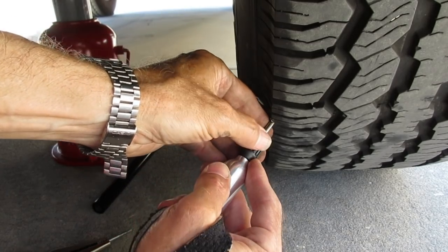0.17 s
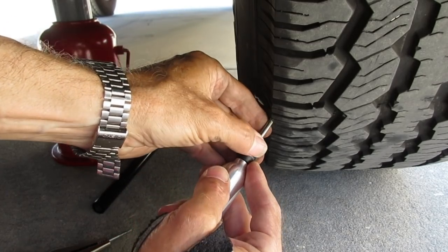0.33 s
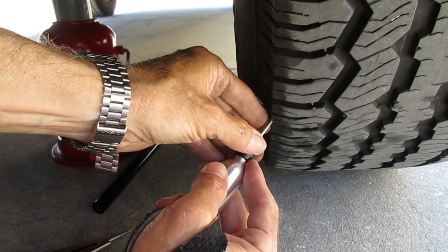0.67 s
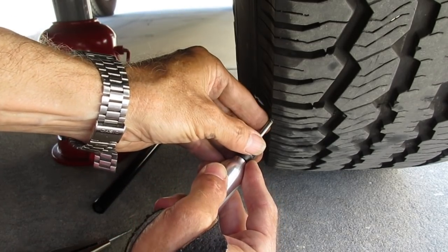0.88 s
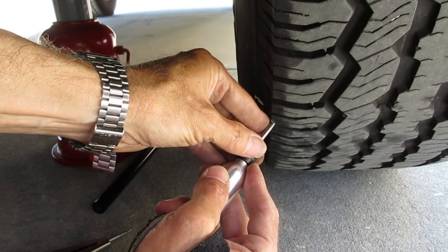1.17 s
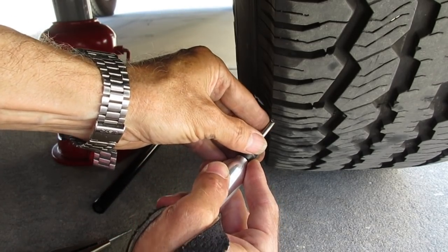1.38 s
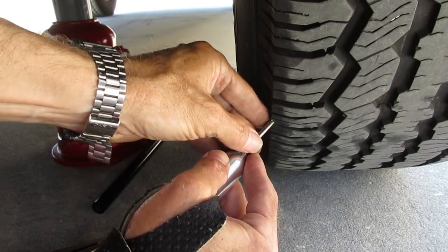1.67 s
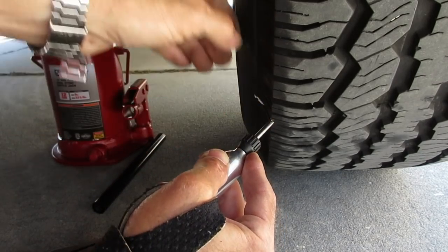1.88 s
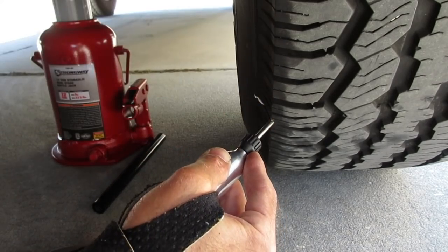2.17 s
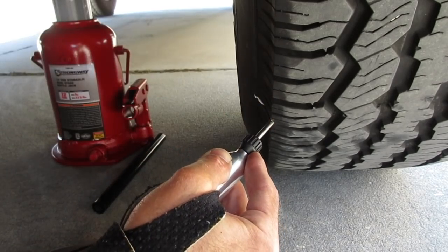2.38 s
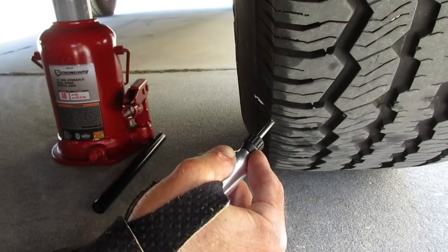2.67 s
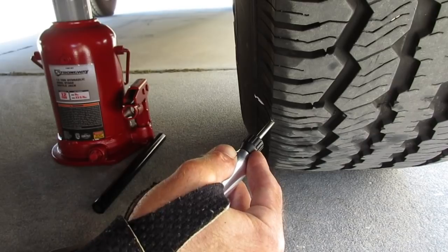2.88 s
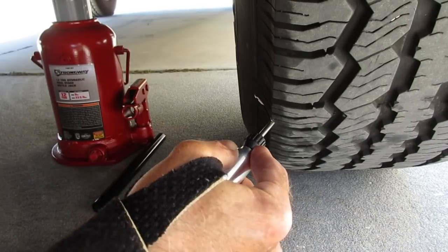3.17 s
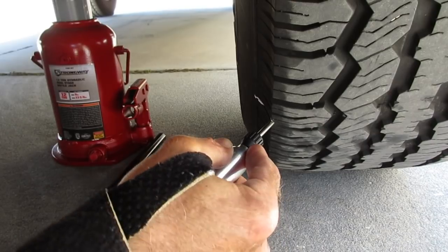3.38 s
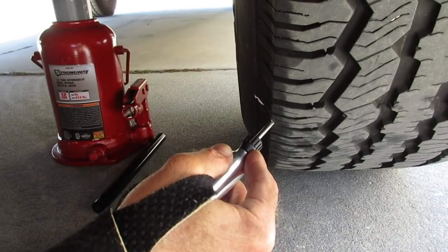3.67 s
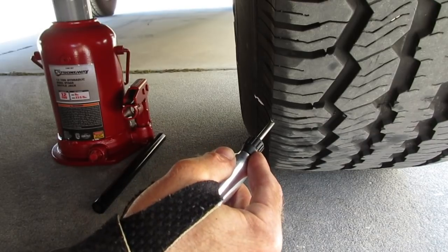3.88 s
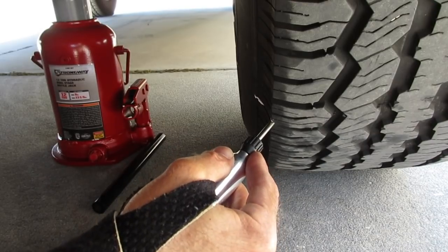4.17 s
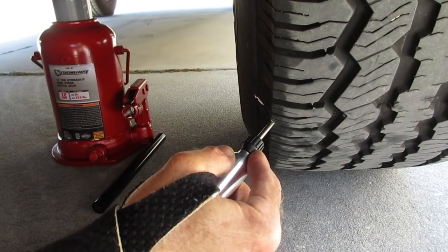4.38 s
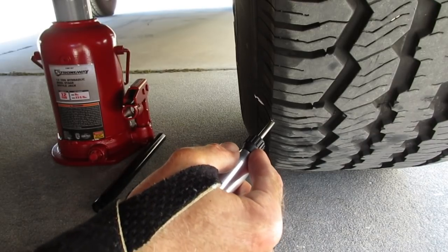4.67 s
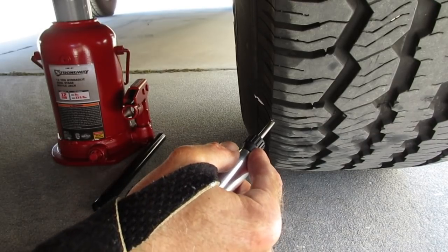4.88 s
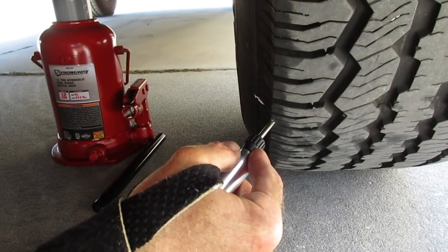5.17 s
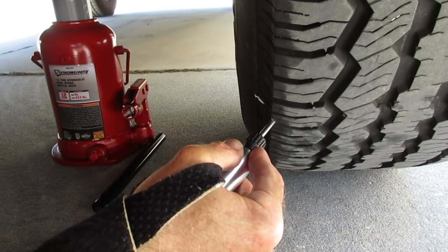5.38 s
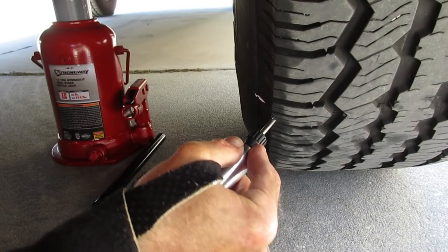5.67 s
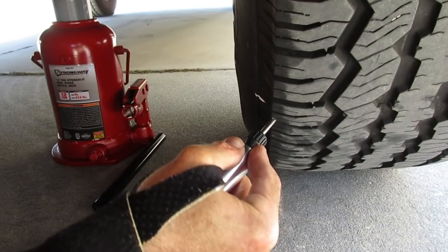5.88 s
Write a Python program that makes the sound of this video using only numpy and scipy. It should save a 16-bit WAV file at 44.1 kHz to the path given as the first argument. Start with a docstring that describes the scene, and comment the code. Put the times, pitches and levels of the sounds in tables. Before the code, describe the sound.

A loud steady tire leak hisses, flutters as a steel tool works the rubber with scrapes and low bumps, then cuts off, leaving faint scratches.

```python
"""Air hisses from a puncture in a tire: turbulent noise, shaped frame by frame in time and frequency.
Fingers shield the hole at first and the jet roars against them as filtered noise; then it blows free,
its spectrum rippled by echoes off tread and rim. A steel plug tool scrapes (slip trains through resonances),
knocks (decaying dull noise) and judders (damped cycles) in the rubber of a tire in a garage.
The hole seals, and the tool scrapes on over a quiet background of noise that swells a little."""
import sys
import numpy as np
from scipy import signal
from scipy.fft import rfft, irfft
from scipy.io import wavfile
from scipy.ndimage import uniform_filter1d

SR = 44100
rng = np.random.default_rng(int(sys.argv[2]) if len(sys.argv) > 2 else 0)


def unload_audio(sound):
    """Save the sound as a 16-bit wav file, at the path given as the first command line argument."""
    columns = np.transpose(np.atleast_2d(sound))
    # keep every value between -1 and 1, then stretch to whole-number steps
    steps = np.round(np.clip(columns, -1, 1) * 32767)
    wavfile.write(sys.argv[1], SR, steps.astype(np.int16))


N = 266319
TIME = np.arange(N) / SR  # s


def gain_of(db):
    """Decibel law: 20 dB is a factor of ten in amplitude."""
    return 10 ** (np.asarray(db) / 20)


def evened(x):
    """Normalisation by mean power: scales x to rms 1."""
    return x / np.sqrt(np.mean(x ** 2) + 1e-20)


def read(points, hz):
    """Interpolation of a spectrum along a logarithmic frequency axis."""
    f, value = np.transpose(points)
    return np.interp(np.log(hz + 1), np.log(f + 1), value)


def follow(rows, t):
    """Linear interpolation in time of each column of a curve."""
    s, *columns = np.transpose(rows)
    return [np.interp(t, s, column) for column in columns]


def step(t, at, edge):
    """Sigmoid transition: a smooth rise from 0 to 1 around a time."""
    return .5 + .5 * np.tanh((t - at) / (2 * edge))


def hump(t, middle, half):
    """Fourth-order exponential window: a flat-topped swell of height 1, down to 1/e at the half length."""
    return np.exp(-np.square((t - middle) / half) ** 2)


def coloured(x, points):
    """Linear filtering: multiplies the spectrum of x by a gain curve, then sets rms 1."""
    gain = gain_of(read(points, np.fft.rfftfreq(N, 1 / SR)))
    return evened(irfft(rfft(x) * gain, N))


def wobble(top_hz):
    """Band-limited random modulation: noise weakened below 4 Hz and above top_hz, at rms 1."""
    hz = np.fft.rfftfreq(N, 1 / SR)
    band = hz / (hz + 4) / (1 + (hz / top_hz) ** 2)
    return evened(irfft(rfft(rng.standard_normal(N)) * band, N))


def slips(per_s, spread_db):
    """Stick-slip friction as a random impulse train of uneven sizes and either sign."""
    size = gain_of(spread_db * np.minimum(rng.exponential(1, N), 3))
    sign = rng.choice([-1., 1.], N)
    happens = rng.random(N) < per_s / SR
    return evened(size * sign * happens)


def band_db(field_db, hz, band):
    """Power summation over the bins of one band, in every frame."""
    inside = (hz >= band[0]) & (hz < band[1])
    power = gain_of(field_db[:, inside]) ** 2
    return 10 * np.log10(power.sum(1))


def jet(patchy_db=0.82, flutter_db=0.24, flutter_hz=90, scatter=0.61, ripple_depth=0.97):
    """Turbulent jet noise: random phases under a spectrum set by the fingers and the shape of the gap."""
    # relative slow levels of the hiss before choking and sealing: t/s, core level/dB, body level/dB, fizz level/dB
    flow = [(0, -22, -28.5, -26.5), (.32, -16.5, -25, -23), (.7, -16.5, -30.5, -25.5),
            (1.08, -15.5, -31.5, -24), (1.2, -18.5, -33.5, -26), (1.5, -21, -30.5, -25.5),
            (1.75, -27.5, -37, -35.5), (2.12, -19.5, -34.5, -28), (2.41, -21.5, -35, -24),
            (2.52, -20, -32.5, -34), (2.85, -17.5, -34.5, -32), (3.25, -16, -33, -29),
            (3.5, -17.5, -30, -31.5), (4, -15.5, -30, -29), (4.45, -18.5, -28, -29.5),
            (4.58, -13, -31, -27.5), (4.72, -17, -34, -29), (5.32, -15.5, -33, -30)]
    # spectrum of the unobstructed jet: f/Hz, level per Hz/dB
    free = [(100, -29), (400, -39.5), (900, -27), (1600, -28.5), (2400, -23), (3100, -18), (4500, -15),
            (5700, -11), (7500, -8), (9500, -2), (10900, 0.5), (12400, -7), (13500, -12), (15000, -18.5)]
    # spectrum of the jet behind the fingers: f/Hz, level per Hz/dB
    shielded = [(100, -34), (400, -25.5), (900, -21.5), (1500, -17.5), (2400, -16), (3200, -10), (4700, -7),
                (6300, -5), (7500, -4.5), (8200, -4), (10500, 1.5), (12400, -9.5), (13400, -16),
                (15000, -19)]
    # change of colour as the rubber pinches the jet: f/Hz, level change/dB
    pinched = [(200, -19), (1400, -0.5), (2300, 2), (3050, 6), (4400, 1), (5500, 4), (6400, 0), (7500, 1.5),
               (11200, 1), (11650, 3), (12200, -6), (12500, 10), (12950, 7), (13400, 3)]
    # the tool briefly chokes the gap: middle t/s, half length t/s, loss of core level/dB
    chokes = [(1.874, 0.033, 5.5), (1.94, 0.026, 1), (2.046, .04, 6), (2.252, 0.046, 4), (2.373, 0.041, 5),
              (2.568, 0.048, 5), (2.739, 0.037, 10.5), (3.415, 0.077, 5), (4.19, .13, 2), (5.205, 0.034, 4)]
    # the pinched gap sings briefly: t/s, half length t/s, f/Hz, half width f/Hz, lift of level/dB
    spits = [(1.81, .025, 11700, 1000, 6), (1.84, .016, 8200, 1300, 11), (1.91, .012, 8200, 1300, 10),
             (2.02, .04, 13000, 800, 3), (2.44, .02, 11400, 900, 5), (2.495, .022, 8700, 1000, 9),
             (2.685, .02, 6600, 1900, 5.5)]
    body_hz, core_hz, fizz_hz = (3500, 6500), (7000, 12000), (12300, 15000)
    frame, hop = 512, 128  # samples
    t, hz = np.arange(N // hop + 5) * hop / SR, np.fft.rfftfreq(frame, 1 / SR)

    # the fingers leave at 1.87 s; the tool alone shields the hole a little
    hand_off_s, hand_move_s, tool_shield = 1.87, .1, 0.16
    shield = (1 - (1 - tool_shield) * step(t, hand_off_s, hand_move_s))[:, None]
    pinch_from_s, pinch_to_s, pinch_edge_s = 1.84, 2.54, 0.025
    pinch = (step(t, pinch_from_s, pinch_edge_s) - step(t, pinch_to_s, pinch_edge_s))[:, None]
    field = shield * read(shielded, hz) + (1 - shield) * read(free, hz) + pinch * read(pinched, hz)

    # the jet swings with pinch and tool, which shifts its ripple in frequency
    pinch_swing, swing_per_s, straight_s = 0.023, .002, 3.8
    aim = 1 - pinch_swing * pinch + swing_per_s * (t[:, None] - straight_s) * (1 - shield)
    # fingers scatter the echoes and flatten their ripple, with full effect from 6400 Hz up
    scattered = scatter * shield * np.minimum(hz / 6400, 1) ** 2
    field = field + ripple_depth * (1 - scattered) * ripple_db(hz / aim)

    # a choked gap loses its core and keeps most of its body and part of its fizz
    core, body, fizz = follow(flow, t)
    choke = sum(db * hump(t, s, half) for s, half, db in chokes)
    # the core goes first as the hole closes
    seal_choke_db, seal_choke_s, seal_choke_edge_s = 8, 5.35, .008
    choke = choke + seal_choke_db * step(t, seal_choke_s, seal_choke_edge_s)
    choke_body, choke_fizz = 0.14, 0.47  # share of the core's loss in dB
    field = field + (core - choke - band_db(field, hz, core_hz))[:, None]
    body_lift = body - choke_body * choke - band_db(field, hz, body_hz)
    fizz_lift = fizz - choke_fizz * choke - band_db(field, hz, fizz_hz)
    field = field + body_lift[:, None] * read([(5800, 0.91), (8000, 0.14)], hz)
    field = field + fizz_lift[:, None] * read([(11000, 0), (12700, 0.97)], hz)
    for s, length, f, width, db in spits:
        field = field + db * np.exp(-((t[:, None] - s) / length) ** 2 - ((hz - f) / width) ** 2)

    # complex noise in each bin, with soft patches of level over 14 bins by 9 frames
    a, b, patches = rng.standard_normal((len(t), len(hz), 3)).T
    patches = uniform_filter1d(patches, size=14, axis=0)
    patches = evened(uniform_filter1d(patches, size=9, axis=1))
    bins = (a + 1j * b) * gain_of(field.T + patchy_db * patches)
    hiss = signal.istft(bins, nperseg=frame, noverlap=frame - hop)[1][:N]
    loudness = np.sqrt((gain_of(field) ** 2).sum(1).mean())
    fluttering = evened(hiss * gain_of(flutter_db * wobble(flutter_hz)))
    return loudness * fluttering * gain_of(sealing_db())


def sealing_db():
    """Flow cut-off: the level falls steeply as the hole closes, then a last wisp of air fades."""
    seal_s, seal_db_per_s, seal_edge_s = 5.365, 380, 0.0062
    wisp_db, wisp_db_per_s = -21, 130
    # time since the seal, with a rounded start
    closing = seal_edge_s * np.logaddexp(0, (TIME - seal_s) / seal_edge_s)
    return np.maximum(-seal_db_per_s * closing, wisp_db - wisp_db_per_s * closing)


def ripple_db(hz):
    """Interference: nearby echoes cancel or strengthen the jet at certain frequencies."""
    # peaks and notches by echoes off tread and rim, before the depth is scaled: f/Hz, width f/Hz, level/dB
    ripple = [(2220, 260, 3), (2460, 180, -4), (3120, 200, 1.5), (3740, 260, 2.5), (4290, 220, -3),
              (4540, 160, 3), (4950, 300, -2), (5680, 250, 1.5), (6450, 540, -9), (7540, 380, 3.5),
              (8120, 320, -9.5), (8530, 200, 1.5), (8980, 320, -6.5), (9520, 300, 1.5), (10110, 400, -14),
              (10550, 220, 2), (11250, 260, 1.5), (11780, 340, -8), (12450, 240, 2.5), (13080, 400, -7),
              (13500, 220, 1.5), (14100, 480, -5.5)]
    return sum(db * np.exp(-np.log(16) * ((hz - f) / w) ** 2) for f, w, db in ripple)


def roar(flutter_db=0.75, ripple_share=0.97):
    """Impingement noise: a jet striking an obstacle breaks into larger eddies, heard as lower-pitched noise."""
    # the jet strikes fingers or tool: start t/s, length t/s, level before the sag/dB
    strikes = [(.15, .22, -40), (.375, 0.766, -23), (1.36, 0.5, -42.5), (3.93, 0.12, -29)]
    # spectrum of the larger eddies: f/Hz, level per Hz/dB
    roar_shape = [(150, -27), (500, -19.5), (850, -6.5), (1300, 1), (2100, 1.5), (2380, 4.5), (2650, 3.5),
                  (3400, 2.5), (4500, -0.5), (8000, -57)]
    rise_s, sag_db, sag_s, release_s = 0.008, 9.5, 0.38, 0.012
    level = np.zeros(N)
    for s, length, db in strikes:
        sag = sag_db * np.expm1(-np.maximum(TIME - s, 0) / sag_s)
        gate = step(TIME, s, rise_s) * (1 - step(TIME, s + length, release_s))
        level += gain_of(db + sag) * gate
    eddies = rng.standard_normal(N) * gain_of(flutter_db * wobble(70))
    ripple_gain = gain_of(ripple_share * ripple_db(np.fft.rfftfreq(N, 1 / SR)))
    eddies = irfft(rfft(eddies) * ripple_gain, N)
    return coloured(eddies, roar_shape) * level


def scraping(chatter_db=3.0, drag_grit=0.35):
    """Stick-slip excitation: dense slips of steel on rubber ring the tool; quick strokes add bright grit."""
    # single scrapes: t/s, level/dB, length t/s, brightness/0 to 1
    scrapes = [(2.606, -30, 0.036, 0.98), (2.825, -31.5, 0.019, 0.15), (2.998, -31.5, .014, 0.5),
               (3.429, -38, 0.01, .3), (3.614, -24, 0.012, 0.1), (4.176, -27.5, 0.019, 0.15),
               (4.428, -31, 0.014, 0.7), (5.502, -50, 0.011, .8), (5.529, -39, .004, 0.4),
               (5.568, -47.5, 0.03, 1), (5.762, -33, 0.0062, 0.85), (5.81, -36, .02, 0.9),
               (5.859, -28, .002, 1), (5.866, -30, 0.014, 0.86), (5.897, -34, .004, 1),
               (5.92, -39, .005, .8), (5.976, -44, .004, .9)]
    # spectrum of bare steel on rubber: f/Hz, level per Hz/dB
    grit = [(300, -28), (1450, -4), (1880, -1), (2380, -10), (2900, -2), (4300, -1), (4900, -5.5),
            (6400, -2.5), (7800, -10), (8350, -2.5), (9550, -14), (10700, -13), (12100, -8), (15000, -25)]
    drag = dragging() * gain_of(chatter_db * wobble(60))
    dull, bright = drag, drag_grit * drag
    for s, db, length, brightness in scrapes:
        age = np.maximum(TIME - s, 0)
        stroke = gain_of(db) * (1 - np.exp(-age / 0.00096)) * np.exp(-(age / length) ** 2)
        share = np.clip(brightness, 0, 1)  # of the power
        dull = dull + np.sqrt(1 - share) * stroke
        bright = bright + np.sqrt(share) * stroke
    return dull * tool_ring(slips(2500, 3.1)) + bright * coloured(slips(6000, 1.6), grit)


def tool_ring(x):
    """Modal resonance: a sum of second-order band-passes stands for tool and tire."""
    # what tool and tire ring with: f/Hz, width f/Hz, relative level/dB
    modes = [(441, 79, 12.5), (780, 640, -4.5), (1090, 220, -18.5), (1520, 145, -10), (2040, 190, -10),
             (2980, 470, 8), (4100, 550, 2), (6350, 1200, -12)]
    hz = np.fft.rfftfreq(N, 1 / SR)
    response = sum(gain_of(db) * 1j * hz * w / (f ** 2 - hz ** 2 + 1j * hz * w) for f, w, db in modes)
    return evened(irfft(rfft(x) * response, N))


def dragging():
    """Power addition of the pushes: how hard the tool's shank is dragged at each moment."""
    # pushes through the rubber: middle t/s, half length t/s, level/dB
    drags = [(2.88, 0.18, -44), (3.448, 0.073, -33.5), (3.68, 0.12, -40.5), (3.972, 0.11, -33),
             (4.214, 0.068, -35), (4.409, 0.1, -32), (5.844, 0.079, -43)]
    return np.sqrt(sum(gain_of(db) ** 2 * hump(TIME, s, half) for s, half, db in drags))


def bumps(judder_spread_db=3.0):
    """Damped oscillation: each let-go shoves the tire wall briefly; small judders crowd around it."""
    # the rubber's strongest let-gos: middle t/s, level of the envelope's peak/dB, f/Hz, half length t/s
    let_gos = [(1.348, -38, 119, 0.0047), (1.802, -38, 111, .0064), (2.318, -31.5, 108, 0.0019),
               (2.465, -20.5, 195, 0.0012), (2.51, -23.5, 137, 0.0019), (2.676, -15, 189, 0.0012),
               (2.705, -27, 132, 0.0046), (2.77, -18, 172, 0.0012), (2.914, -22.5, 122, .002),
               (3.018, -23.5, 167, 0.0015), (3.079, -22, 173, 0.002), (3.27, -17, 169, .0015),
               (3.299, -15, 131, 0.0023), (3.555, -21.5, 136, 0.0014), (3.622, -18.5, 400, 0.0015),
               (3.656, -23.5, 104, 0.0043), (3.711, -21.5, 167, 0.0012), (3.762, -19.5, 153, 0.0016),
               (3.921, -18, 350, 0.0026), (3.935, -22.5, 124, 0.0036), (4.042, -18, 383, 0.0026),
               (4.185, -18, 314, 0.0026), (4.359, -27, 415, 0.0053), (4.616, -22, 148, 0.0014),
               (4.645, -21.5, 131, 0.0018), (5.117, -33.5, 115, 0.003), (5.431, -25, 89, 0.005),
               (5.683, -29.5, 100, 0.0027), (5.981, -24.5, 110, .0044), (6.025, -22, 122, .003)]
    # spectrum of the small judders: f/Hz, level per Hz/dB
    judder_shape = [(20, -36), (45, -1), (80, -0.5), (150, -2.5), (260, -12), (450, -23), (900, -30),
                    (4000, -80)]
    # small judders: against a let-go nearby, against a drag, and while the tool is just held
    judder_db, drag_db, hold_db = -13, -6, -58
    near_s, deep_hz = 0.063, 130  # reach in time; let-gos above deep_hz set off weaker judders
    grip_s, grip_rise_s = 3.3, 0.53  # the hand starts to lean on the tool
    near_bumps = np.max([gain_of(db) * min(deep_hz / hz, 1) ** 2 * np.exp(-abs(TIME - s) / near_s)
                         for s, db, hz, _ in let_gos], axis=0)
    near = gain_of(judder_db) * near_bumps
    dragged = gain_of(drag_db) * dragging()
    held = gain_of(hold_db) * step(TIME, grip_s, grip_rise_s)
    strain = np.sqrt(near ** 2 + dragged ** 2 + held ** 2)
    out = coloured(slips(160, judder_spread_db), judder_shape) * strain
    for (s, db, hz, length), turn in zip(let_gos, rng.random(len(let_gos))):
        around = abs(TIME - s) < .04
        t = TIME[around] - s
        out[around] += gain_of(db) / np.cosh(t / length) * np.sin(2 * np.pi * (hz * t + turn))
    return out


def knocks():
    """Heavily damped impact: rubber reduces each knock to a short dull puff of noise."""
    # knocks of the tool against the tire: t/s, level/dB, decay time constant t/s
    hits = [(2.426, -43.5, 0.042), (2.611, -41, 0.058), (2.823, -39, 0.023), (2.999, -38, 0.018),
            (4.18, -25, 0.0096), (5.502, -33, 0.0085), (5.611, -35, .008)]
    # spectrum of a knock: f/Hz, level per Hz/dB
    knock_shape = [(100, -15), (400, -2), (720, 0), (1000, -12), (1300, -7), (1900, -29), (3000, -15),
                   (6000, -41)]
    level = np.zeros(N)
    for s, db, decay in hits:
        age = np.maximum(TIME - s, 0)
        level += gain_of(db) * (1 - np.exp(-age / 0.00066)) * np.exp(-age / decay)
    return level * coloured(rng.standard_normal(N), knock_shape)


def garage(x, near_db=-14, tail_db=-21, t60=0.16):
    """Convolution with a room response: close echoes from floor, wheel and jack, then a short faint tail."""
    t = np.arange(SR // 3) / SR
    near, tail = rng.standard_normal((2, len(t)))
    near = near * (t > .002) * np.exp(-t / 0.0043)
    near = gain_of(near_db) * near / np.linalg.norm(near)
    tail = tail * (t > .008) * gain_of(-60 * t / t60)
    tail = gain_of(tail_db) * tail / np.linalg.norm(tail)
    return x + signal.fftconvolve(x, near + tail)[:N]


def background_rush():
    """Stationary filtered noise under a slow envelope: a soft rush that swells a little."""
    # spectrum of the rush: f/Hz, level per Hz/dB
    rush_shape = [(20, -4), (100, -3), (300, -8.5), (800, -7.5), (1300, -15), (2000, -19), (4000, -24),
                  (8000, -28.5), (15000, -38)]
    # swell of the rush: t/s, level/dB
    swell = [(0, -57.5), (2.3, -53.5), (4.8, -49.5), (6.04, -48.5)]
    return gain_of(follow(swell, TIME)[0]) * coloured(rng.standard_normal(N), rush_shape)


def scene():
    """Superposition: all sources stand straight ahead, alike in both channels."""
    background = background_rush()
    mono = garage(jet() + roar() + scraping() + knocks() + bumps()) + background
    return np.array([mono, mono])


def record(dry):
    """Band limitation by a linear-phase low-pass filter at 15060 Hz."""
    low_pass = signal.firwin(601, 15060, window=("kaiser", 9), fs=SR)
    return signal.oaconvolve(dry, low_pass[None], "same")


dry = scene()
out = record(dry)
unload_audio(out)
```